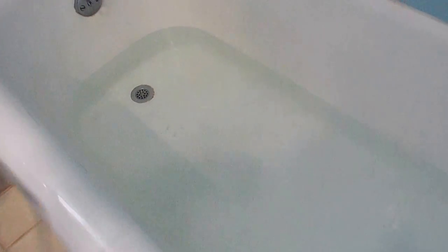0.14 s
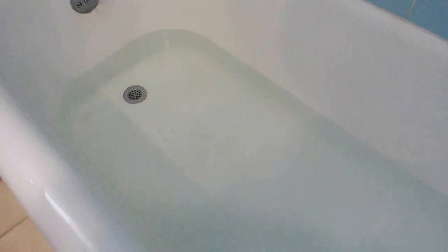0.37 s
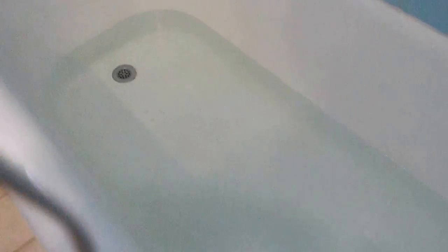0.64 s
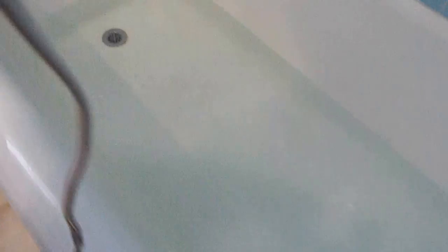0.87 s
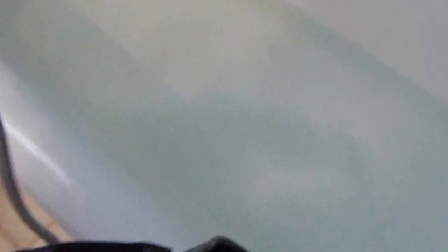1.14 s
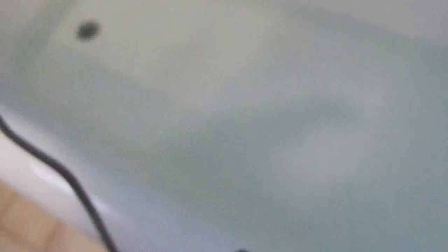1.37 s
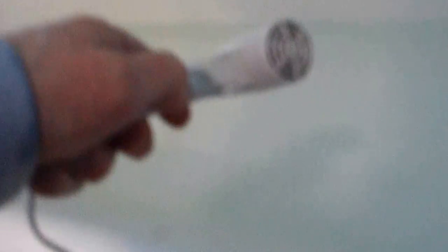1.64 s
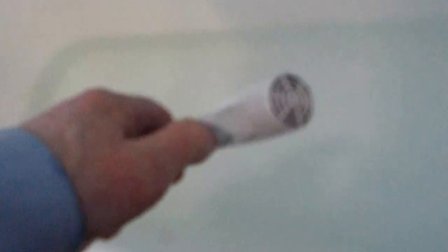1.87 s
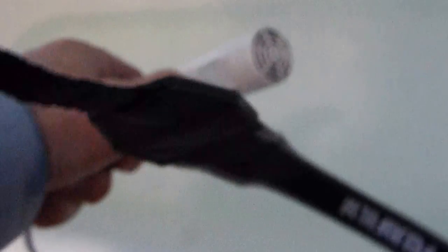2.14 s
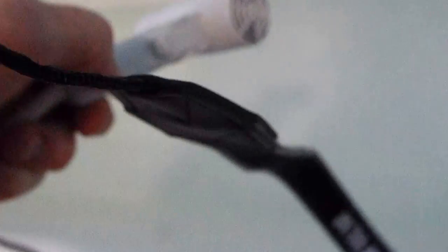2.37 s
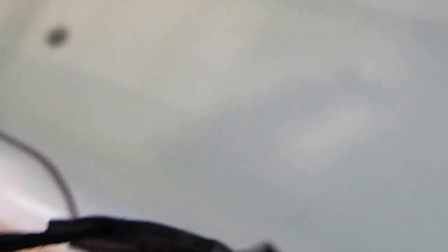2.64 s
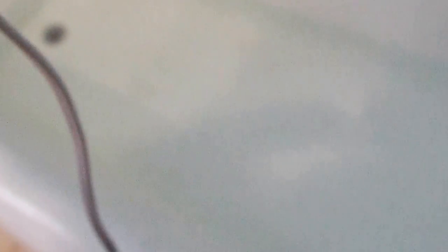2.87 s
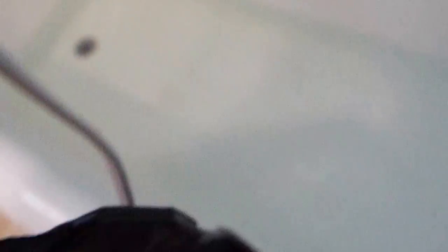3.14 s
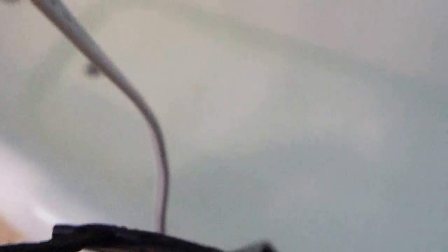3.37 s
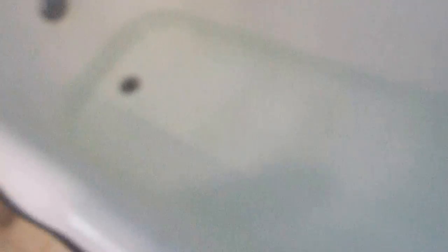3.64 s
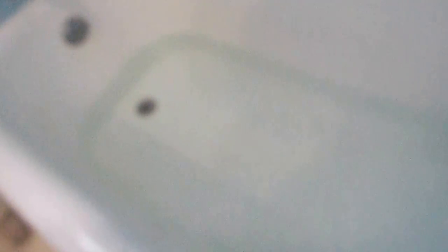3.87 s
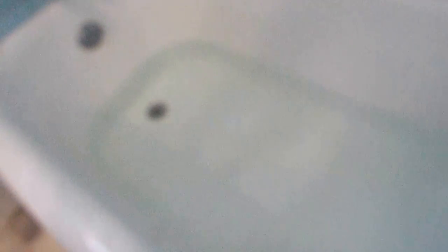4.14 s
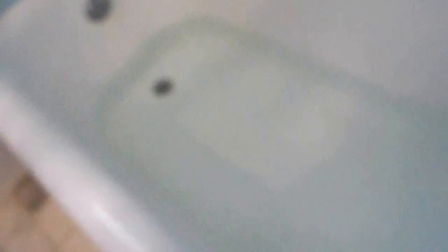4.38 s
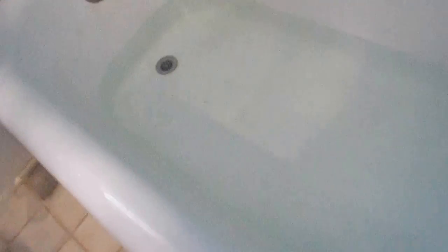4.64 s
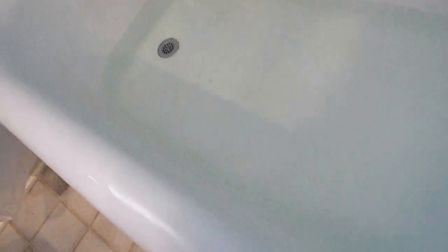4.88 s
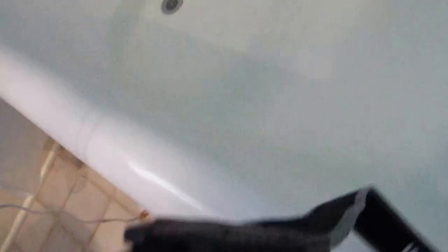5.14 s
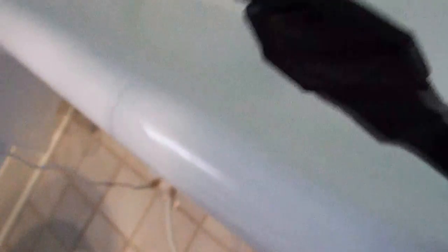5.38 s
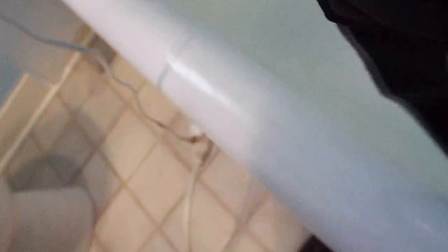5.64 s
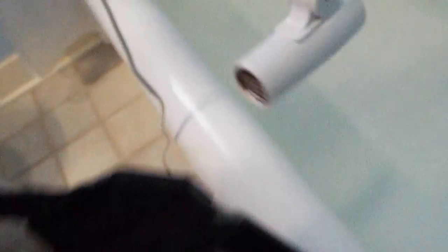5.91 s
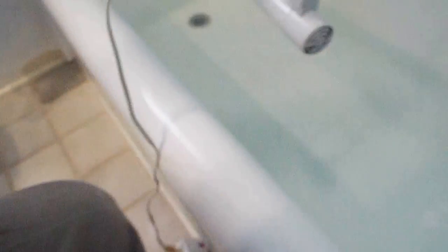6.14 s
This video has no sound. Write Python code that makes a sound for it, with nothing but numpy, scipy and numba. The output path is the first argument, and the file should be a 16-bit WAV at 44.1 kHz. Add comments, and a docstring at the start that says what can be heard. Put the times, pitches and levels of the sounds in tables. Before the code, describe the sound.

Plastic taps and rubbing in a quiet tiled bathroom, a switch click, then a handheld dryer spins up to a shrill airy whine, knocked loudly against the microphone.

```python
"""A tiled bathroom: a hand-held camera's strap knocks and rustles, then a small hair dryer is switched on.
Knocks ring decaying body modes; rubs and the switch's tail are patches of dense noise slips, over steady
hiss and a faint throb. The motor spins up to a whine of shaft harmonics over filtered-noise air and a
resonant housing roar. The dryer bumps the camera, adding low shaft tones and roar, and later blows past it
as low turbulence. Loud knocks overload the recorder, whose limiter ducks everything for a moment."""
import sys
import numpy as np
from scipy import signal
from scipy.fft import rfft, irfft
from scipy.io import wavfile
from scipy.ndimage import uniform_filter1d
from numba import njit

SR = 44100
rng = np.random.default_rng(int(sys.argv[2]) if len(sys.argv) > 2 else 0)


def volts_from_decibels(level):
    """Turn decibel levels (scalar or array-like) into linear amplitude factors."""
    exponent = np.asarray(level, float) / 20
    return 10 ** exponent


def store_wav(level_fs):
    """Save 16-bit WAV to argv[1]."""
    pcm = np.round(np.clip(np.atleast_2d(level_fs), -1, 1) * 32767)
    wavfile.write(sys.argv[1], SR, pcm.T.astype(np.int16))


N = 276507  # length [samples]

# Colour of the steady hiss: (frequency [Hz], level [dB per Hz])
HISS_COLOUR = [(25, -8), (100, -17.5), (250, -13), (500, -5.5), (1200, -4.5), (2000, -7.5), (2800, -14.5),
               (3600, -5), (4700, -7), (5300, -15), (9000, -16), (16000, -39)]
HISS_DB = -53
# Colour of the murmur in the background: (frequency [Hz], level [dB])
THROB_COLOUR = [(300, -33), (520, 2.5), (800, -0.5), (1300, -3.5), (2200, -24.5)]
THROB_HZ, THROB_DB = 24.4, -57

# Strap and fingers rubbing; the last row is the tail of the dryer's switch click:
# (start [s], end [s], level [dB], level change from start to end [dB], brightness [dB])
SLIP_PATCHES = [(0, 0.047, -56, -2, -10), (0.05, 0.113, -44, -6, 2.5), (0.175, 0.209, -40.5, 6, -0.5),
                (0.192, 0.268, -26.5, -12, -2.5), (0.269, 0.36, -42.5, -12, -3),
                (0.353, 0.444, -40, -7, -0.5), (0.506, 0.603, -35.5, 0.5, 1),
                (0.587, 0.633, -45, -6.5, -14.5), (0.647, 0.688, -33.5, -7, -4),
                (0.68, 0.749, -37.5, -3.5, 3), (0.775, 0.884, -52, 1, 3), (0.932, 1, -51, 9, 4),
                (0.971, 1.015, -33, -15, -9), (1.018, 1.066, -35, 2, 8), (1.06, 1.178, -53.5, 2, -6),
                (1.41, 1.477, -42.5, -4, 2.5), (1.808, 1.856, -40, -14, 2.5), (1.843, 1.873, -40.5, 7, 1.5),
                (1.864, 1.91, -25.5, -27, 8)]
# Colour of the bright register of the slips: (frequency [Hz], level [dB per Hz])
SLIP_BRIGHT_COLOUR = [(900, -51), (1600, -12), (2400, -1), (3000, -5), (4000, 4.5), (4800, -0.5),
                      (5400, -30), (9000, -36)]
# Colour of the top register of the slips: (frequency [Hz], level [dB per Hz])
SLIP_TOP_COLOUR = [(3500, -32), (5500, 4.5), (6500, 3.5), (8000, 1), (10500, -8.5), (15000, -35)]
# outer registers against the bright one, for a patch of middle brightness
DULL_DB, TOP_DB, TOP_PER_DB = -7, -8.5, 1.38

# Knocks on the camera body: (time [s], peak level [dB], strongest pitch [Hz],
# fall-off away from that pitch [dB per octave], left minus right [dB])
KNOCKS = [(0.04, -24, 1100, 9, 12), (0.1118, -23.5, 1100, 9.5, 12), (0.179, -25, 4300, -1, 0),
          (0.2559, -8, 3170, 12, -7), (.365, -21.5, 1100, 6, 12), (.39, -28.5, 3700, 15, -18),
          (0.4449, 5, 1500, 2.5, 12.5), (0.518, -26.5, 1100, 7, 21), (.652, -20.5, 1100, 27, 20),
          (0.654, -17, 3700, 12, -13.5), (.978, -16, 1100, 5, 13), (1.0244, -11.5, 1100, 12, 20.5),
          (1.184, -29.5, 6200, 14, 0), (1.425, -30, 1100, 26, 15), (1.786, -59, 3700, 6, -60),
          (1.802, -37, 1100, 13, 18), (1.869, -8.5, 4600, 18, 1), (3.9956, 6, 1500, 5.5, 23),
          (4.028, -2.5, 1200, 22, 20), (4.091, -8, 1100, 21, 21), (4.149, -5.5, 1100, 14, 14),
          (4.2585, 5, 1420, 8, 14.5), (4.304, -7, 1200, 20, 17), (4.358, -4, 1500, 4, 18.5),
          (4.431, 3, 1400, 2.5, 16.5), (5.486, 3.5, 1500, 4, -1)]
# Ringing modes of the camera body: (frequency [Hz], level [dB], 60 dB decay time [s])
BODY_MODES = [(1100, -4, 0.017), (1500, 0.5, 0.0081), (1860, 0, 0.01), (2800, -9, 0.013), (3140, 1, 0.0072),
              (3700, 7, 0.0075), (4600, 7.5, 0.004), (6200, 6, 0.0032), (7000, 4, 0.0016),
              (10400, -32, .004)]

# The shaft gains speed along an S-curve
SWITCH_S, HALF_SPEED_S, SPIN_UP_S = 1.87, 1.9503, 0.0993
# Full shaft speed, drifting with the load: (time [s], speed [Hz])
CRUISE = [(2.45, 457.3), (2.74, 454.6), (4.47, 456.6), (5.66, 452.3), (5.96, 455.6), (6.27, 452.8)]
# The two strongest whines as the dryer is moved about:
# (time [s], level of shaft multiple 5 [dB], level of multiple 10 [dB])
WHINE = [(2.3, -25.5, -11.5), (2.62, -18, -14.5), (2.73, -27.5, -11), (2.92, -20, -18.5), (3.3, -23.5, -15),
         (3.5, -22, -25.5), (3.62, -26.5, -18.5), (4.07, -26, -14), (4.2, -23, -20.5), (4.33, -29, -11),
         (4.5, -22, -22), (4.66, -23, -15), (4.94, -21, -23.5), (5.25, -17, -22.5), (5.48, -21.5, -10.5),
         (5.6, -16.5, -13), (5.78, -24, -20), (6.27, -20, -15.5)]
# Shaft shake heard through the air: (time [s], level of multiple 1 [dB], level of multiple 2 [dB])
SHAKE = [(2.15, -58.5, -49), (2.448, -52.5, -31.5), (3.244, -52.5, -51.5), (3.454, -45, -35.5),
         (3.95, -42.5, -41), (4.12, -49.5, -37.5), (4.74, -45, -37.5), (5.224, -38, -36),
         (5.778, -49.5, -39), (5.996, -55, -48), (6.27, -38.5, -33)]
# Weaker shaft harmonics: (multiple of shaft speed, level above WEAKER_BASE_DB [dB])
WEAKER_HARMONICS = [(3, -9), (4, -14), (6, -5), (7, -11), (8, -5), (9, -3.5), (11, -22), (12, -20),
                    (13, -14), (14, -17), (16, -19), (17, -20), (18, -11), (19, -19), (20, -15), (21, -8),
                    (22, -21), (23, -14), (24, -12), (25, -19), (26, -22), (27, -21), (28, -24)]
WEAKER_BASE_DB = -26.5
FIFTEEN_DB, FIFTEEN_WAVER_DB = -25, 2.5  # shaft multiple 15 swells and fades at random
# tones emerge late and broken while the shaft gains speed; growths multiply the cubic spool-up
LOW_TONE_GROWTH, TONE_GROWTH, SPIN_UP_FLUTTER_DB = 1.6, 2.3, 16
# Where the dryer is held: (time [s], left minus right [dB])
PLACE = [(1.9, 1.5), (3.3, 2), (3.6, -0.5), (5.3, 1), (6.27, 2)]
SHAKE_PAN_DB = 1.5  # the shake sits a little left of the whine

# Airflow at full speed as the nozzle turns:
# (time [s], level [dB], treble tilt [dB per octave], level of the 2-3 kHz band [dB])
AIRFLOW = [(1.87, -17, -2, 0), (2.0, -21, 3.5, 0), (2.2, -20, 3.5, -2), (2.45, -15.5, 2.5, -3),
           (2.7, -18.5, 4.5, -1.5), (3.0, -18.5, -2, -2), (3.4, -19, -1.5, -2), (3.7, -18, 1, -0.5),
           (4.3, -19, -0.5, 0), (4.6, -20.5, 0, 0.5), (5.3, -19, 1, 2.5), (5.6, -19, -1, 2),
           (5.9, -19, 0, 0.5), (6.27, -15, 2.5, -1)]
# Colour of the rushing air: (frequency [Hz], level [dB per Hz])
AIR_COLOUR = [(100, -67), (380, -37.5), (800, -19.5), (1250, -5), (2200, -2.5), (3100, -3), (4470, 6.5),
              (5300, -7), (7000, -2.5), (9000, -13.5), (11200, -15), (13200, -28), (15000, -23),
              (16200, -45)]
AIR_POWER = 1.75  # the air's amplitude grows as this power of shaft speed
# Air column resonances of the duct: (frequency [Hz], width [Hz], level [dB])
DUCT = [(3184, 56, 3.5), (3507, 165, -4), (4300, 48, -10.5)]

# Housing resonances: (frequency [Hz], width [Hz], level [dB])
HOUSING = [(1246, 6.6, 20), (1405, 200, 7.5), (1393, 240, 4)]
# the housing roars more when the shaft shakes harder
ROAR_DB, ROAR_PER_DB, SHAKE_MID_DB, ROAR_LOW_HZ = -24.5, 0.55, -46.5, 490
# The dryer rests against the camera and shakes it:
# (start [s], end [s], level of multiple 1 [dB], level of multiple 2 [dB], roar level [dB])
TOUCHES = [(3.996, 4.052, -26, -25, -27), (4.051, 4.092, -36, -22.5, -28), (4.143, 4.195, -33, -36, -22.5),
           (4.2, 4.298, -29, -25, -16.5), (4.305, 4.375, -34.5, -27.5, -28), (4.455, 4.485, -30, -26, -28),
           (4.479, 4.589, -26, -29.5, -23.5), (4.584, 4.697, -31, -33, -28)]
TOUCH_PAN_DB, TOUCH_FALL_DB = 15, -4  # each contact slackens

# The jet brushing the microphones: (time [s], level [dB])
DRAUGHT = [(5.42, -81), (5.455, -38.5), (5.52, -45), (5.59, -44), (5.72, -50.5), (6.0, -48.5),
           (6.02, -39.5), (6.135, -47.5), (6.16, -30.5), (6.27, -41)]
# Colour of that turbulence: (frequency [Hz], level [dB per Hz])
DRAUGHT_COLOUR = [(25, -25), (60, -11), (120, -14), (250, -1.5), (560, 0.5), (670, 8.5), (780, 0),
                  (1100, -3), (1500, -36), (3000, -70)]

ROOM_T60_S, ROOM_DB, ROOM_DULL_HZ = 0.36, -14, 9650
# Colour difference of the microphones: (frequency [Hz], left minus right [dB])
PORT_BALANCE = [(100, -13), (1000, -4), (3000, -1.5), (5000, -3), (8000, -8.5), (15000, -4)]
# Lag of the left microphone: (frequency [Hz], phase [radians])
PORT_PHASE = [(0, 0.16), (3000, 0.16), (5500, 1.31), (8000, 0.74), (12000, 1.46), (22050, 0.38)]
MIC_LOW_HZ = 173
LIMIT, ATTACK_S, RELEASE_S = 0.6, 0.0004, 0.036  # limiter threshold [of full scale] and times


def curve(rows, floor=None):
    """Columns of a table joined by straight lines in time; floor, if given, before the first row."""
    s, *columns = np.transpose(rows)
    return [np.interp(np.arange(N) / SR, s, c, left=floor) for c in columns]


def unit(x):
    """Scale to rms 1."""
    return x / np.sqrt(np.mean(x ** 2))


def band_unit(x, lo, hi):
    """Scale so that the band lo-hi Hz has rms 1."""
    part = signal.sosfilt(signal.butter(4, [lo, hi], "band", fs=SR, output="sos"), x)
    return x / np.sqrt(np.mean(part ** 2))


def tone(x, points):
    """Filter by (frequency [Hz], level [dB]) points on a log-frequency axis."""
    hz, db = np.transpose(points)
    f = np.fft.rfftfreq(N, 1 / SR) + 1
    return irfft(rfft(x) * volts_from_decibels(np.interp(np.log(f), np.log(hz), db)), N)


def peak_filter(x, hz, width_hz):
    """One resonance of unit gain at its centre."""
    return signal.lfilter(*signal.iirpeak(hz, hz / width_hz, SR), x)


def walk(rate):
    """Random levels held 1 / rate s and slewed twice; spread near 1."""
    k = int(SR / rate)
    steps = np.repeat(rng.standard_normal(N // k + 1), k)
    return 1.34 * uniform_filter1d(uniform_filter1d(steps, k), k)[:N]


def flutter(points, depth_db, rate, tilt_db=0, mid_db=0):
    """Coloured noise whose half-octave bands flicker on their own; tilt above 4 kHz, mid_db at 2-3 kHz."""
    spectrum = rfft(tone(rng.standard_normal(N), points))
    f = np.fft.rfftfreq(N, 1 / SR) + 1
    out = 0
    for octave in np.arange(5, 14.6, 0.5):  # log2 of the band's centre in Hz
        share = np.clip(1 - np.abs(np.log2(f) - octave) * 2, 0, 1)
        level_db = depth_db * walk(rate) + tilt_db * max(octave - 12, 0)
        level_db = level_db + mid_db * (octave in (11, 11.5))
        out = out + irfft(spectrum * share, N) * volts_from_decibels(level_db)
    return out


def patch(start, end, fall_db, rise_s=0.013, stop_s=0.025):
    """An envelope that opens, slopes by fall_db and shuts."""
    t = np.arange(N) / SR
    edges = np.clip(np.minimum((t - start) / rise_s, (end - t) / stop_s), 0, 1)
    return edges * volts_from_decibels(fall_db * np.clip((t - start) / (end - start), 0, 1))


def pan(x, db):
    """Place a sound by its left-minus-right level."""
    return x * volts_from_decibels(np.array([db, -db]).reshape(2, -1) / 2)


def room(x):
    """Tiled walls: a dense decaying tail, different at each microphone."""
    t = np.arange(int(0.6 * SR)) / SR
    tail = rng.standard_normal((2, len(t))) * volts_from_decibels(-60 * t / ROOM_T60_S) * (t > 0.003)
    tail = signal.lfilter(*signal.butter(1, ROOM_DULL_HZ, fs=SR), tail)
    tail /= np.sqrt(np.sum(tail ** 2, axis=1, keepdims=True))
    return volts_from_decibels(ROOM_DB) * signal.fftconvolve(tail, x[None], axes=1)[:, :N]


def ports(x):
    """The two microphones differ in colour, and the left hears the treble a little later."""
    f = np.fft.rfftfreq(N, 1 / SR)
    lag = np.interp(f, *np.transpose(PORT_PHASE))
    late = irfft(rfft(x[0]) * np.exp(-1j * lag), N)
    half = np.array(PORT_BALANCE) * [1, 0.5]
    return np.array([tone(late, half), tone(x[1], half * [1, -1])])


def hiss():
    """Steady coloured noise, partly shared by the two channels."""
    noise = rng.standard_normal((3, N))
    return volts_from_decibels(HISS_DB) * unit(tone(noise[1:] + 0.73 * noise[0], HISS_COLOUR))


def throb():
    """A faint low murmur: noise swelling once per beat of a slightly unsteady pulse."""
    beat = np.cumsum(THROB_HZ * (1 + 0.027 * walk(8.07))) / SR % 1
    swell = np.sin(np.pi * beat ** 0.61) ** 4
    return volts_from_decibels(THROB_DB) * unit(tone(rng.standard_normal(N) * swell, THROB_COLOUR))


def rubbing_and_switch_tail():
    """Strap and fingers rub, then the switch click tails off: patches of dense slips in three registers."""
    slips = rng.standard_normal((3, 3, N))  # register, then shared / left / right
    slips = slips * volts_from_decibels(2.4 * np.array([walk(510), walk(150), walk(270)]))[:, None]
    slips = slips * volts_from_decibels(1.6 * rng.exponential(size=(3, 1, N)))  # a few slips are much harder
    slips = slips[:, :1] + 0.99 * slips[:, 1:]
    bright = pan(unit(tone(slips[0], SLIP_BRIGHT_COLOUR)), -0.49)
    dull = pan(unit(signal.lfilter(*signal.iirpeak(1100, 2.5, SR), slips[1])), 11.5)
    top = pan(unit(tone(slips[2], SLIP_TOP_COLOUR)), -5.0)
    out = 0
    for start, end, db, fall_db, bright_db in SLIP_PATCHES:
        mix = bright + volts_from_decibels(DULL_DB - bright_db) * dull + volts_from_decibels(TOP_DB + TOP_PER_DB * bright_db) * top
        out = out + patch(start, end, fall_db) * volts_from_decibels(db) * mix
    return out


def knocks():
    """Each knock is a sharp push that rings the camera body's modes, most near its own pitch."""
    out, t = np.zeros((2, N + SR)), np.arange(2048) / SR
    chance = rng.standard_normal((len(KNOCKS), len(BODY_MODES)))
    for (s, db, hz, slope_db, pan_db), draw in zip(KNOCKS, chance):
        ring = 0
        for (f, mode_db, t60), detune in zip(BODY_MODES, draw):
            gain = volts_from_decibels(mode_db - slope_db * abs(np.log2(f / hz)) - 60 * t / t60)
            ring = ring + gain * np.sin(2 * np.pi * f * (1 + 0.025 * detune) * t)
        ring = ring * (1 - np.exp(-t / 0.00026))  # soften the onset
        # a small shell radiates no bass
        ring = signal.lfilter(*signal.butter(2, 600, "high", fs=SR), ring)
        i = int(s * SR)
        out[:, i:i + len(t)] += pan(volts_from_decibels(db) * ring / np.abs(ring).max(), pan_db)
    out = out[:, :N]
    return out + 0.074 * room(out.mean(axis=0))


def motor():
    """The shaft's speed as a share of full speed, and its slightly jittering angle in radians."""
    t = np.arange(N) / SR
    full_hz, = curve(CRUISE)
    speed = 1 / (1 + np.exp((HALF_SPEED_S - t) / SPIN_UP_S))
    turn = 2 * np.pi * np.cumsum(full_hz * speed * (1 + 0.000423 * walk(30))) / SR
    return speed, turn


def shaft_tones(speed, turn, spool_db, tilt_db):
    """Sines at multiples of shaft speed: the low shake (1, 2) and the whine (3 and up)."""
    one_db, two_db = curve(SHAKE)
    five_db, ten_db = curve(WHINE)
    fifteen_db = FIFTEEN_DB + FIFTEEN_WAVER_DB * walk(6)
    led = {1: one_db, 2: two_db, 5: five_db, 10: ten_db, 15: fifteen_db}
    levels = [(k, db + 2.77 * walk(25.04)) for k, db in led.items()]
    for k, db in WEAKER_HARMONICS:
        waver_db = 3.3 * walk(7) + 2.8 * walk(28)
        levels.append((k, WEAKER_BASE_DB + db + waver_db + tilt_db * max(np.log2(k / 9), 0)))
    shake, whine = 0, 0
    for k, level_db in levels:
        # broken up while the shaft is slow; the high tones grow latest
        level_db = level_db + SPIN_UP_FLUTTER_DB * np.sqrt(1 - speed) * (walk(39.74) / 2 - 0.5)
        growth = LOW_TONE_GROWTH if k < 5 else max(TONE_GROWTH, k / 6)
        sine = np.sin(k * turn + rng.uniform(0, 2 * np.pi))
        line = np.sqrt(2) * volts_from_decibels(level_db + spool_db * growth) * sine
        if k < 3:
            shake = shake + line
        else:
            whine = whine + line
    return shake, whine


def rushing_air(speed, air_db, tilt_db, mid_db):
    """Flickering coloured noise that grows with speed, plus wavering duct resonances fed by it."""
    level_db = air_db + AIR_POWER * 20 * np.log10(speed)
    air = volts_from_decibels(level_db) * band_unit(flutter(AIR_COLOUR, 0.86, 14, tilt_db, mid_db), 2200, 4510)
    duct = sum(peak_filter(air, f, w) * volts_from_decibels(db + 7.0 * walk(9)) for f, w, db in DUCT)
    return air + duct


def housing_roar():
    """Noise through the housing's wavering resonances, without its bass."""
    noise = rng.standard_normal(N)
    roar = unit(sum(volts_from_decibels(db + 2.5 * walk(23)) * peak_filter(noise, f, w) for f, w, db in HOUSING))
    return signal.lfilter(*signal.butter(2, ROAR_LOW_HZ, "high", fs=SR), roar)


def touches(turn, roar):
    """The dryer against the camera: shaft shake and roar pass straight into its body."""
    once, twice = np.sqrt(2) * np.sin(turn), np.sqrt(2) * np.sin(2 * turn)
    out = 0
    for start, end, one_db, two_db, roar_db in TOUCHES:
        shaking = volts_from_decibels(one_db) * once + volts_from_decibels(two_db) * twice + volts_from_decibels(roar_db) * roar
        out = out + patch(start, end, TOUCH_FALL_DB, 0.0052, 0.0099) * shaking
    return out * volts_from_decibels(2.0 * walk(45))  # the contact pressure trembles


def dryer():
    """Shaft harmonics, rushing air, roar and contact shake in stereo; all but the contact echo in the room."""
    on = np.arange(N) / SR > SWITCH_S
    speed, turn = motor()
    spool_db = 60 * np.log10(speed)  # amplitude as the cube of speed
    air_db, tilt_db, mid_db = curve(AIRFLOW)
    shake, whine = shaft_tones(speed, turn, spool_db, tilt_db)
    air = rushing_air(speed, air_db, tilt_db, mid_db)
    roar = housing_roar()
    one_db = curve(SHAKE)[0]
    roar_db = ROAR_DB + ROAR_PER_DB * (one_db - SHAKE_MID_DB)
    low = shake + roar * volts_from_decibels(roar_db + 0.27 * spool_db)
    place_db, = curve(PLACE)
    direct = pan(low * on, place_db + SHAKE_PAN_DB) + pan((whine + air) * on, place_db)
    direct = direct + pan(touches(turn, roar), TOUCH_PAN_DB)
    return direct + room((air + 0.81 * whine + 0.053 * low) * on)


def draught():
    """Low turbulence on the microphone ports, mostly shared."""
    gust_db, = curve(DRAUGHT, floor=-200)
    mid, side = (band_unit(flutter(DRAUGHT_COLOUR, 2.5, 18), 80, 400) for _ in range(2))
    return volts_from_decibels(gust_db) * (mid + 0.12 * side * np.array([[1], [-1]]))


def scene():
    """All sources at the two microphones, over hiss and throb."""
    at_ports = ports(rubbing_and_switch_tail() + knocks() + dryer())
    return hiss() + throb() + at_ports + draught()


@njit
def duck(peak, limit, attack, release):
    """Gain that falls fast when the peak passes the limit and recovers slowly."""
    gain, hold, g = np.empty(len(peak)), 0., 1.
    for i in range(len(peak)):
        hold = max(peak[i], hold * release)
        g += attack * (min(1., limit / (hold + 1e-9)) - g)
        gain[i] = g
    return gain


def top_cut(x):
    """Nothing passes above the cut-off."""
    return signal.sosfilt(signal.butter(12, 16500, fs=SR, output="sos"), x)


def record(dry):
    """A limiter linked across both channels, hard clipping of what slips past it, and a bass cut."""
    peak = np.abs(dry).max(axis=0)
    gain = duck(peak, LIMIT, 1 / (ATTACK_S * SR), np.exp(-1 / (RELEASE_S * SR)))
    clipped = np.clip(dry * gain, -1, 1)
    bass_cut = signal.butter(2, MIC_LOW_HZ, "high", fs=SR, output="sos")
    mix = signal.sosfilt(bass_cut, clipped)
    return top_cut(mix)


dry = scene()
out = record(dry)
store_wav(out)
```